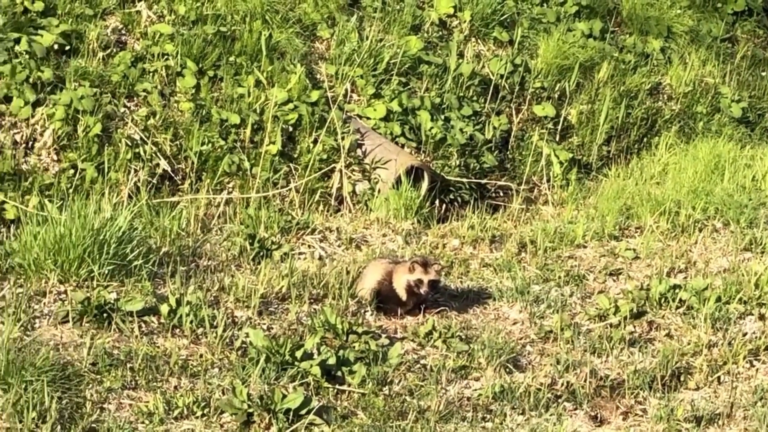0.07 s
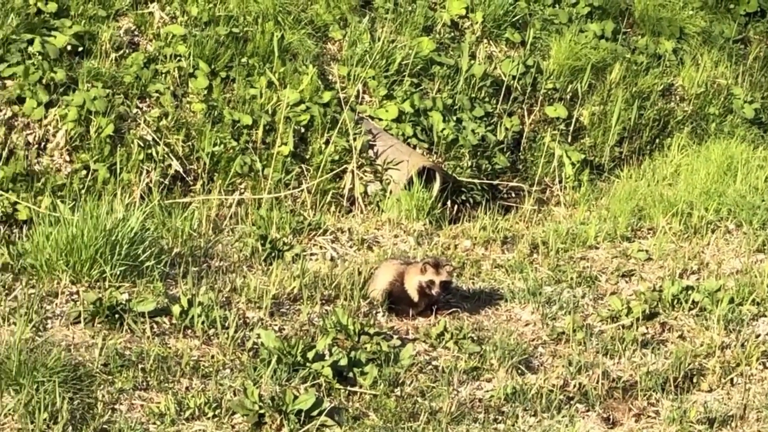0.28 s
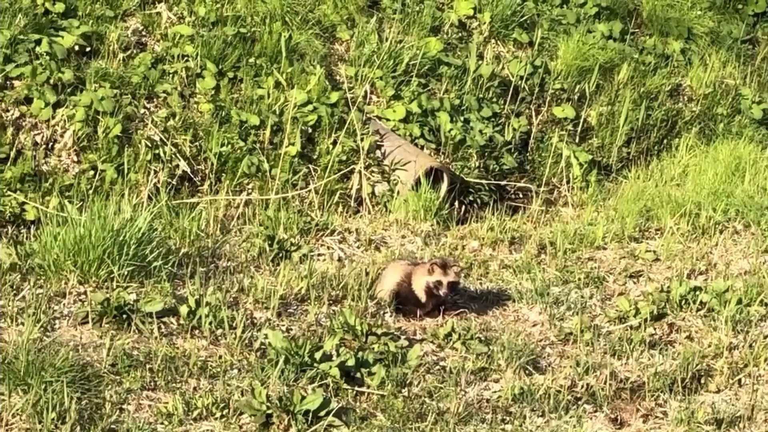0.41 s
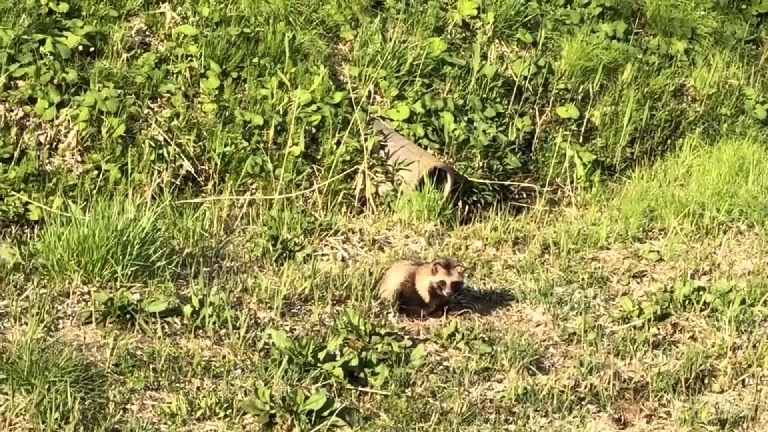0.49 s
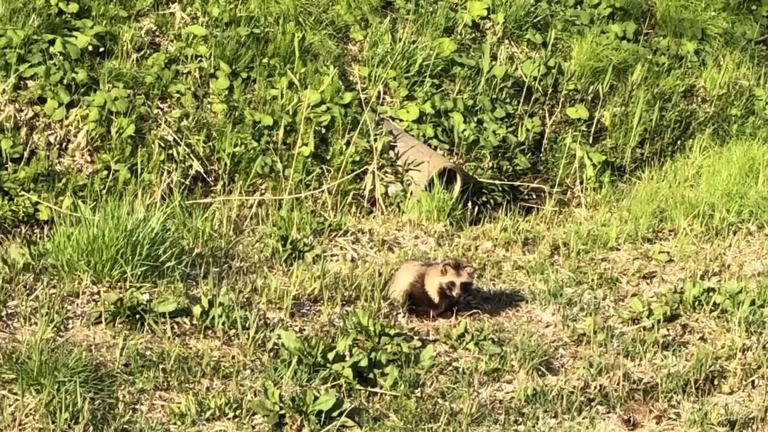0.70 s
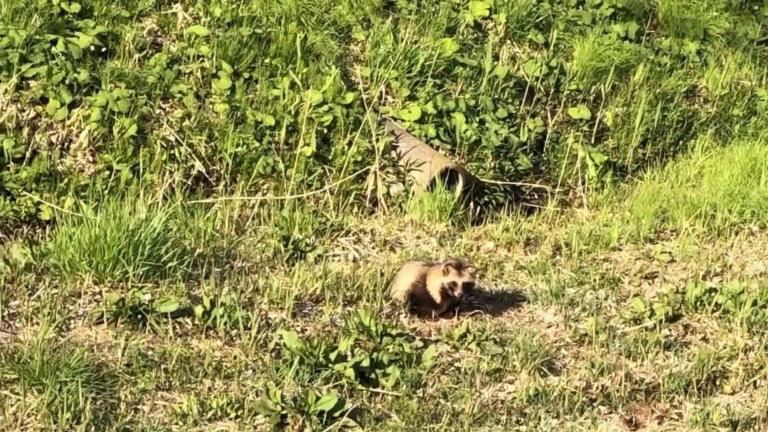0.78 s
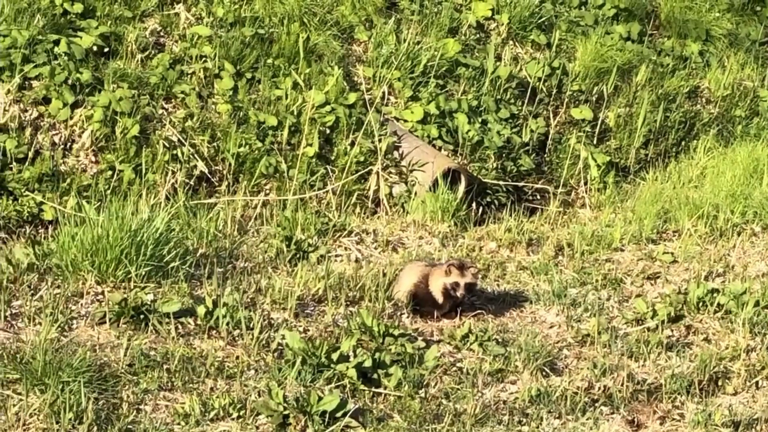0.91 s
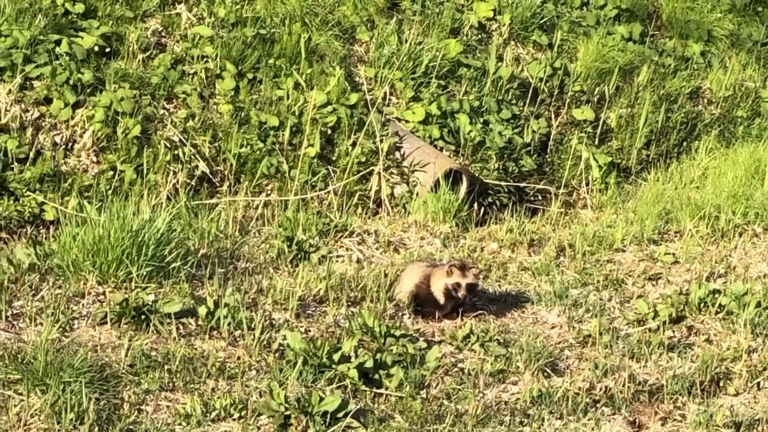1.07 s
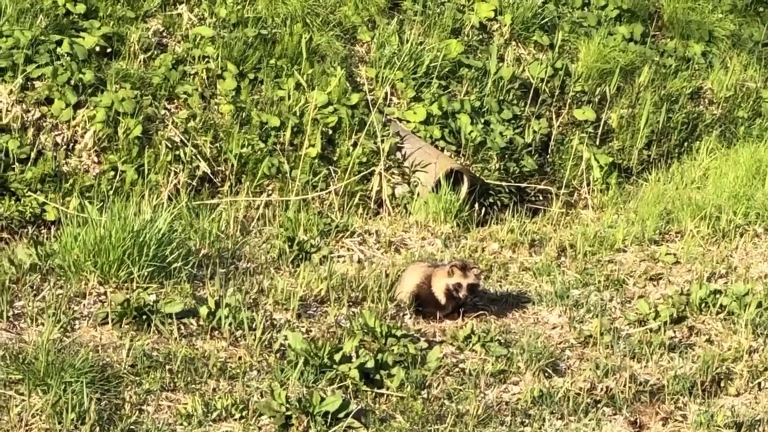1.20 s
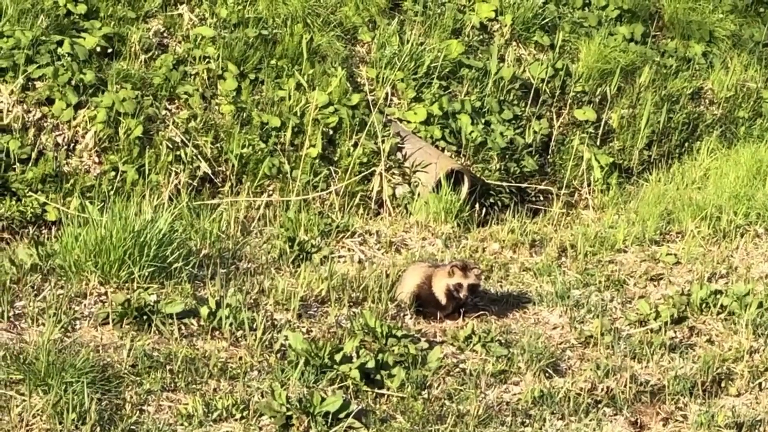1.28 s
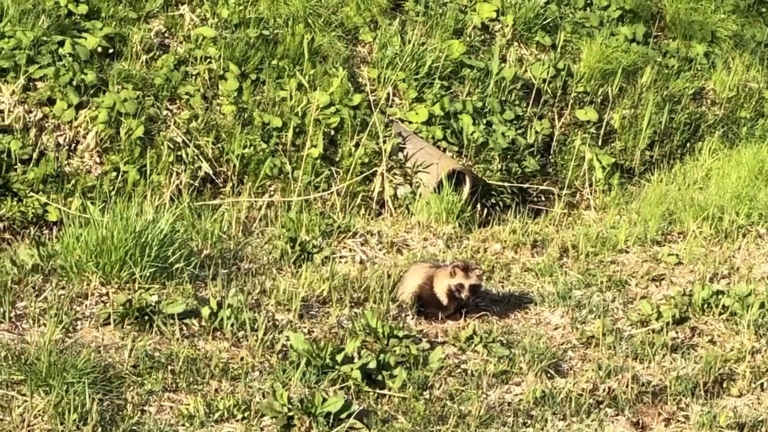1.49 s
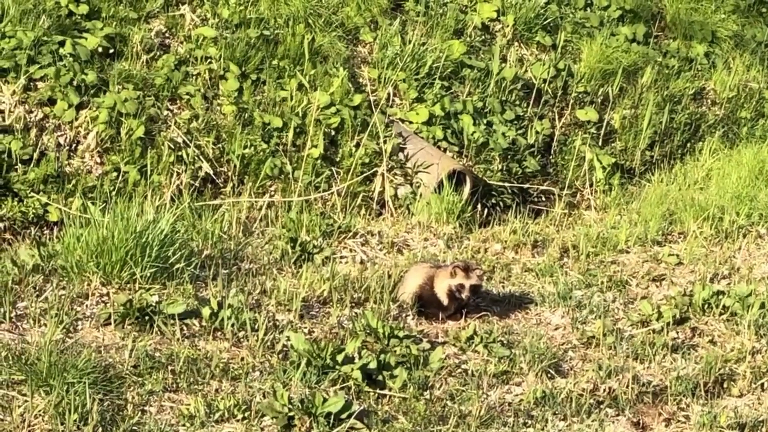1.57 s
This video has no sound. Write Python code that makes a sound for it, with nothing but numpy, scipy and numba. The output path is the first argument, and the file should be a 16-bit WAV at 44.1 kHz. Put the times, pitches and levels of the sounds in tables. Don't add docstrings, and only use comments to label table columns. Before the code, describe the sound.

A small wild dog chatters two bursts of sharp, high, raspy yelps in open grass.

```python
import sys
import numpy as np
from scipy import signal
from scipy.io import wavfile
from scipy.ndimage import uniform_filter1d
from numba import njit

SR = 44100
rng = np.random.default_rng(int(sys.argv[2]) if len(sys.argv) > 2 else 0)


def store_wav(level_fs):
    pcm = np.round(np.clip(np.atleast_2d(level_fs), -1, 1) * 32767)
    wavfile.write(sys.argv[1], SR, pcm.T.astype(np.int16))


def convert_level_to_amplitude(level_db):
    exponent = np.asarray(level_db, float) / 20
    return 10 ** exponent


N = 70560

# f/Hz, level per Hz/dB
HUSH = [(15, -52), (25, -55), (37, -33.5), (123, -9), (667, -18.5), (730, -25), (1250, -24), (1470, -31),
        (5400, -33), (7020, -65), (11900, -120)]
# f/Hz, width/Hz, level/dB
MACHINE = [
    (111, 20, -45),
    (724, 10, -50),
    (1434, 35, -51.5),
]
# start t/s, end t/s, first f/Hz, last f/Hz, level/dB
CHEST_GRUNT = (1.205, 1.262, 345, 310, -33)
# start t/s, end t/s, pitch f/Hz
RASP_TIMES = [(.231, .268, 920), (.288, .295, 1000), (.3185, .326, 950), (.373, .381, 1050),
              (.4315, .441, 1000), (.496, .502, 950), (.5615, .567, 950), (.613, .672, 880),
              (1.035, 1.070, 600), (1.092, 1.104, 900), (1.164, 1.186, 1080), (1.2585, 1.285, 740)]
# first level/dB, last level/dB
RASP_EFFORT = [(-30, -20), (-19, -21), (-9, -13), (-10, -12), (-12, -12), (-11, -13), (-12, -14),
               (-15, -17), (-36, -24), (-10, -11), (-9, -12), (-10, -21)]
# start t/s, top t/s, end t/s, top pitch f/Hz
SQUEAL_ARCHES = [(.2315, .262, .266, 1070), (.255, .277, .289, 1150), (.321, .334, .3455, 1245),
                 (.376, .391, .4025, 1230), (.436, .452, .464, 1205), (.498, .518, .532, 1170),
                 (.563, .578, .589, 1165), (.614, .626, .638, 800), (.634, .643, .653, 1120),
                 (.648, .659, .666, 720), (1.044, 1.050, 1.070, 810), (1.097, 1.120, 1.134, 1225),
                 (1.182, 1.208, 1.222, 1130), (.2305, .234, .266, 760)]
# level/dB, extra fundamental level/dB
SQUEAL_EFFORT = [(-23.5, 6.5), (-8, 0.5), (-4, 4.5), (-9, 3.5), (-5.5, 0.5), (-7, 0.5), (-7, 2), (-15, 5),
                 (-13, -2), (-19, 3), (-25, 13), (-10, -1.5), (-7, -8), (-27, 7.5)]
# t/s, upper resonance f/Hz, its level/dB, cheek notch depth/0-1
MOUTH_SHAPE = [(.25, 3050, -13, 0.7), (.335, 3360, -20, 0.07), (.40, 3100, -9, 0.7), (.52, 2964, -8, .9),
               (0.602, 3180, -9.5, 0.7), (0.651, 2963, -10, 0), (1.061, 3250, -15, 0.1),
               (1.118, 3743, -8.5, 0.11), (1.17, 3470, -13, 0), (1.206, 3324, -13, 0.53),
               (1.28, 3630, -11, 0.12)]

RISE, FALL = 0.25, 0.17
SWELL_S, CUT_S = 0.003, 0.0012


def level(x, db):
    return x * convert_level_to_amplitude(db) / np.sqrt(np.mean(x ** 2))


@njit
def svf(x, hz, width):
    y, b, l = np.empty(len(x)), 0., 0.
    for i in range(len(x)):
        g, k = np.tan(np.pi * hz[i] / SR), width / hz[i]
        v = (b + g * (x[i] - l)) / (1 + g * (g + k))
        b, l, y[i] = 2 * v - b, l + 2 * g * v, k * v
    return y


def band(x, hz, width_hz):
    return svf(x, hz + np.zeros(N), float(width_hz))


def band_twice(x, hz, width_hz):
    return band(band(x, hz, width_hz), hz, width_hz)


def walk(rate_hz):
    k = int(SR / rate_hz)
    w = uniform_filter1d(uniform_filter1d(rng.standard_normal(N), k), k)
    return w / w.std()


def gate(t, start, end, attack, release):
    return np.clip(np.minimum((t - start) / attack, (end - t) / release), 0, 1)


def air_hush():
    out, swell = 0, walk(9)
    table_hz, table_db = np.array(HUSH).T
    for hz in 28 * 2 ** np.arange(0, 7.8, 0.5):
        per_hz_db = np.interp(np.log(hz), np.log(table_hz), table_db)
        db = per_hz_db + 10 * np.log10(hz) + 0.6 * swell + 1.5 * walk(12)
        noise = band_twice(rng.standard_normal(N), hz, hz * 0.57)
        out = out + convert_level_to_amplitude(db) * level(noise, 0)
    return level(out, -37)


def machine_hum():
    return sum(level(band(rng.standard_normal(N), hz, width), db) for hz, width, db in MACHINE)


def echo_tail(t60_s):
    s = np.arange(SR // 2) / SR
    tail = rng.standard_normal(len(s)) * convert_level_to_amplitude(-60 * s / t60_s) * (s > 0.0023)
    return level(tail, 0) / np.sqrt(len(s))


def echoes(x):
    tail = convert_level_to_amplitude(-9.5) * echo_tail(0.082) + convert_level_to_amplitude(-25) * echo_tail(0.47)
    return signal.fftconvolve(x, tail)[:N]


def push_thumps(clean, rough):
    push = convert_level_to_amplitude(-31) * clean ** 2 + convert_level_to_amplitude(-3) * rough ** 2
    return band(push, 110, 260)


def grunt(t):
    start, end, first_hz, last_hz, db = CHEST_GRUNT
    pitch = np.interp(t, [start, end], [first_hz, last_hz]) * (1 + 0.03 * walk(150))
    tone = np.sin(2 * np.pi * np.cumsum(pitch) / SR)
    return convert_level_to_amplitude(db) * gate(t, start, end, 0.0033, 0.0035) * tone


def folds(hz, low_db=0, high_db=0):
    phase = 2 * np.pi * np.cumsum(hz) / SR
    out = 0
    for k in range(1, 7):
        db = -1.5 * (k - 1) + low_db * (k == 1) + high_db * (k > 3)
        out = out + convert_level_to_amplitude(db) * np.cos(k * phase)
    return 2 * out


def rasps(t):
    drift = np.exp(0.21 * walk(900))
    size = convert_level_to_amplitude(3 * walk(700))
    breath = 2 * rng.standard_normal(N) * convert_level_to_amplitude(-5)

    def rattle(hz):
        return folds(hz * drift, -3) * size + breath

    out = np.zeros(N)
    for (start, end, hz), effort_db in zip(RASP_TIMES, RASP_EFFORT):
        loudness = convert_level_to_amplitude(np.interp(t, [start, end], effort_db))
        out += loudness * gate(t, start, end, 0.0006, CUT_S) * rattle(hz)

    close_s = 0.008
    for (start, top, end, hz), (db, _) in zip(SQUEAL_ARCHES, SQUEAL_EFFORT):
        falling = (np.maximum(t - top, 0) / (end - top)) ** 2 * gate(t, start, end, SWELL_S, CUT_S)
        flutter = gate(t, end - CUT_S, end + 3 * close_s, CUT_S, close_s)
        flutter = flutter * np.exp(-np.maximum(t - end, 0) / close_s)
        rough = convert_level_to_amplitude(-8) * falling + convert_level_to_amplitude(-9) * flutter
        out += convert_level_to_amplitude(db) * rough * rattle(hz * (1 - FALL))
    return out


def squeals(t):
    out, wobble = np.zeros(N), 1 + 0.00958 * walk(339.4)
    for (start, top, end, hz), (db, low_db) in zip(SQUEAL_ARCHES, SQUEAL_EFFORT):
        rising = t < top
        side_s = np.where(rising, top - start, end - top)
        flatness = np.where(rising, 2.1, 2.4)
        away = np.minimum(np.abs(t - top) / side_s, 1) ** flatness
        pitch = hz * (1 - np.where(rising, RISE, FALL) * away) * wobble
        tone = folds(pitch, low_db, -8 * (1 - away))
        out += convert_level_to_amplitude(db) * gate(t, start, end, SWELL_S, CUT_S) * tone
    return out * convert_level_to_amplitude(2.8 * walk(130))


def throat(x, t):
    s, mouth_hz, mouth_db, notch = np.array(MOUTH_SHAPE).T
    y = convert_level_to_amplitude(-16.5) * band_twice(x, 722, 432)
    y = y + convert_level_to_amplitude(-12) * band_twice(x, 1079, 560)
    y = y + band_twice(x, 2130, 722)
    y = y + convert_level_to_amplitude(-17) * band_twice(x, 1900, 2400)
    y = y + convert_level_to_amplitude(np.interp(t, s, mouth_db) + 9.5) * band_twice(x, np.interp(t, s, mouth_hz), 560)
    y = y + convert_level_to_amplitude(-19.5 + 7.5) * band_twice(x, 4200, 450)
    y = y - np.clip(np.interp(t, s, notch), 0, 1) * band(y, 3500, 450)
    return signal.sosfilt(signal.butter(4, 4400, fs=SR, output="sos"), y)


def scene():
    t = np.arange(N) / SR + 0.001
    clean = throat(squeals(t), t)
    rough = throat(rasps(t), t)
    voice = clean + rough + grunt(t)
    dog = voice + echoes(voice) + push_thumps(clean, rough)
    field = air_hush() + machine_hum()
    return (dog + field)[None]


def top_cut(x):
    return signal.sosfilt(signal.butter(12, 10190, fs=SR, output="sos"), x)


def record(dry):
    ceiling, skew, hold = 0.86, 0.02, 4
    x = ceiling * np.tanh((dry + skew * dry ** 2) / ceiling)
    x = signal.sosfilt(signal.cheby1(6, 0.3, 5000, fs=SR, output="sos"), x)
    x = np.repeat(x[:, ::hold], hold, axis=1)[:, :N]
    x = signal.sosfilt(signal.butter(6, 9600, fs=SR, output="sos"), x)
    x = signal.sosfilt(signal.ellip(8, 0.3, 60, 10500, fs=SR, output="sos"), x)
    mix = np.clip(x - 0.012, -1, 1)
    return top_cut(mix)


dry = scene()
out = record(dry)
store_wav(out)
```